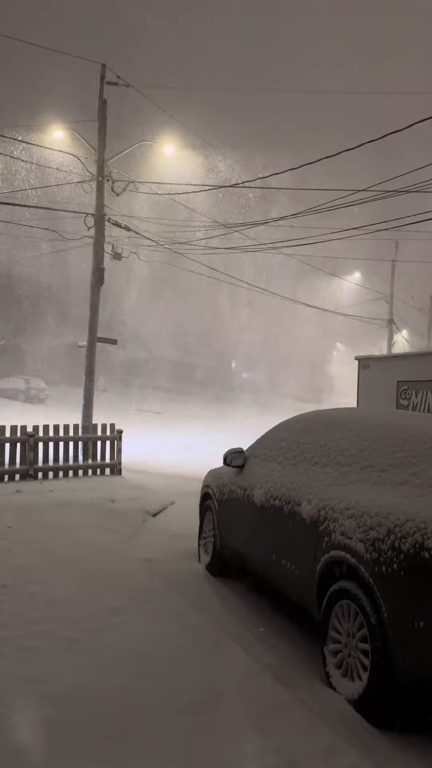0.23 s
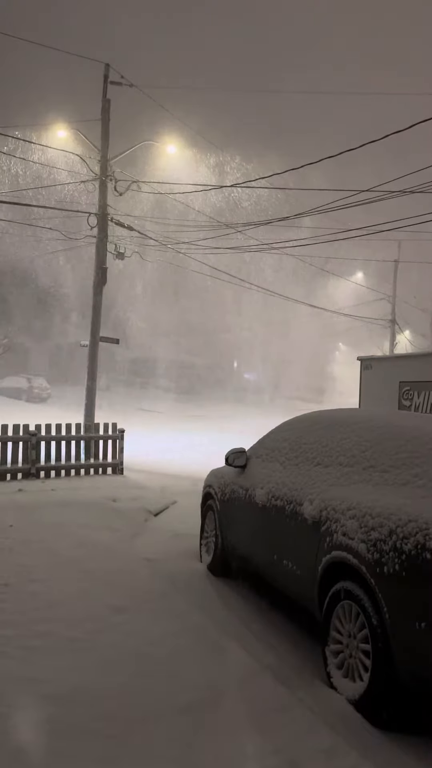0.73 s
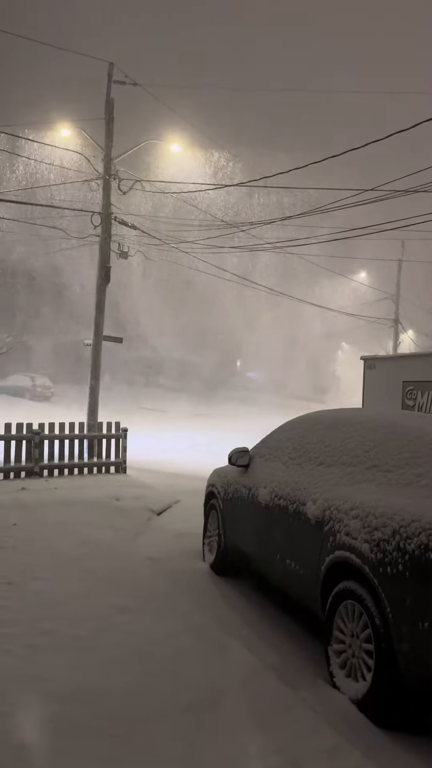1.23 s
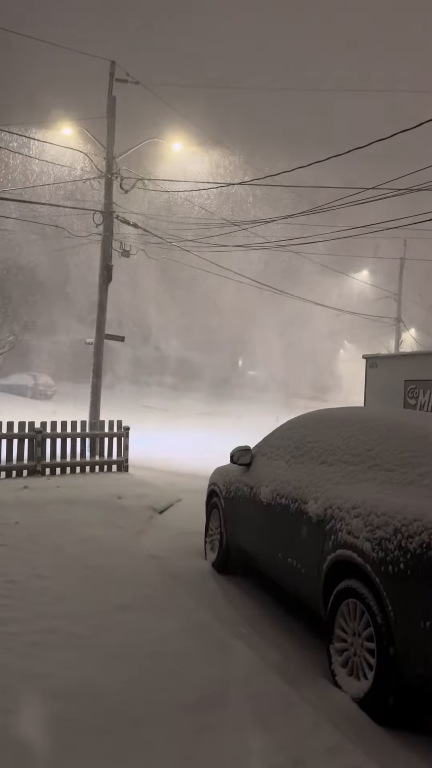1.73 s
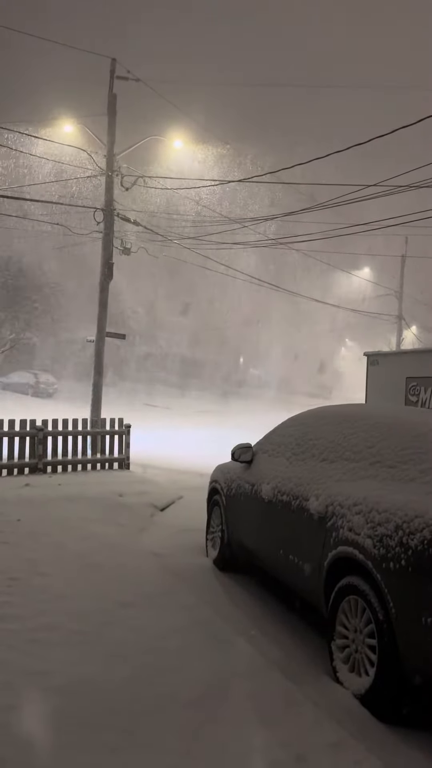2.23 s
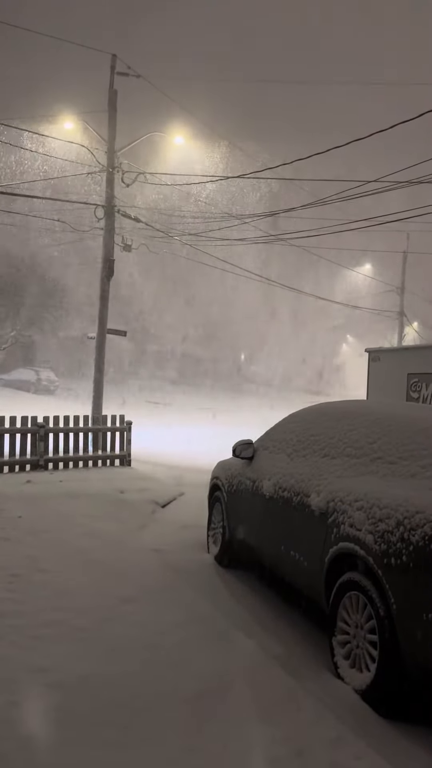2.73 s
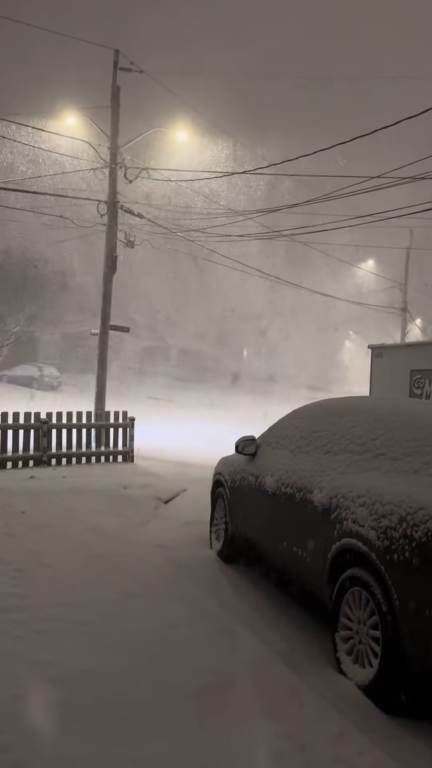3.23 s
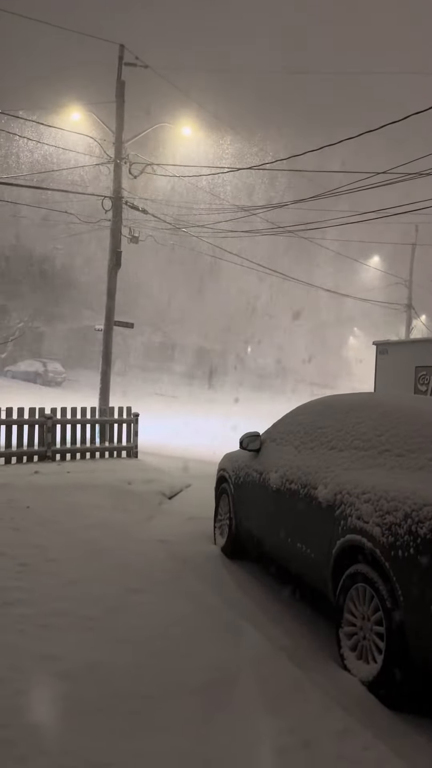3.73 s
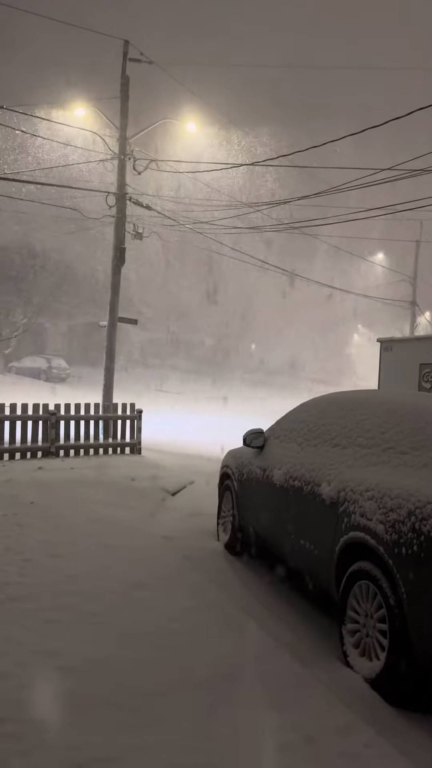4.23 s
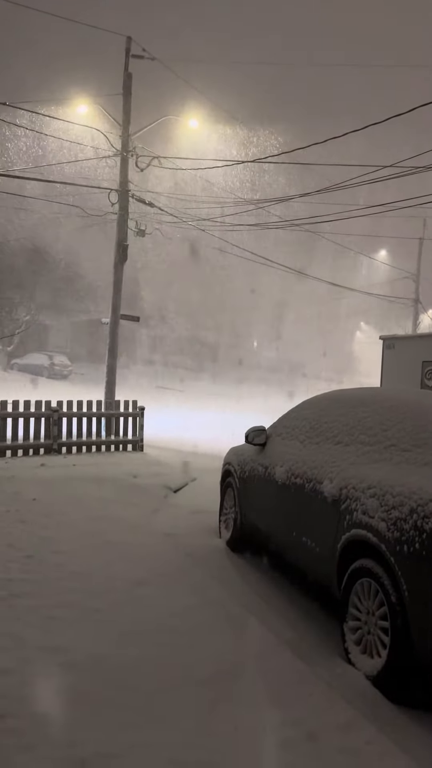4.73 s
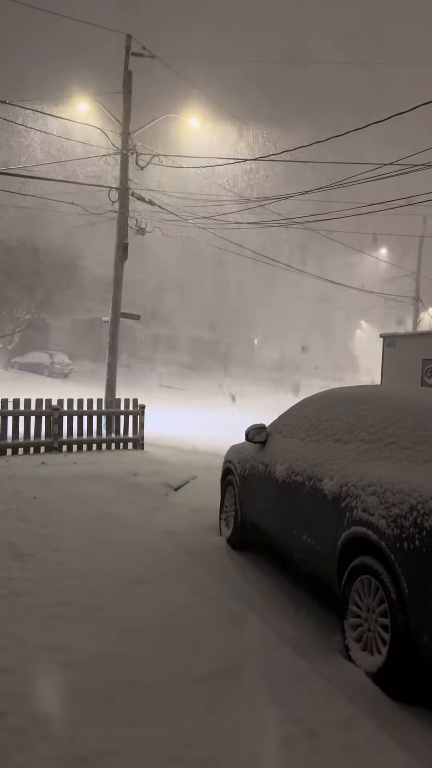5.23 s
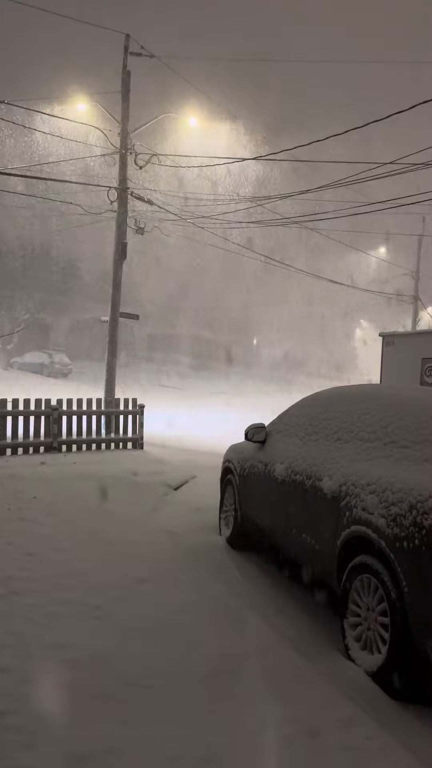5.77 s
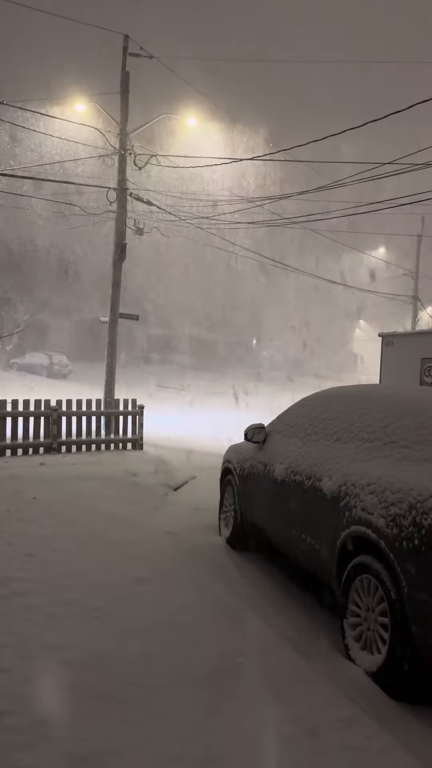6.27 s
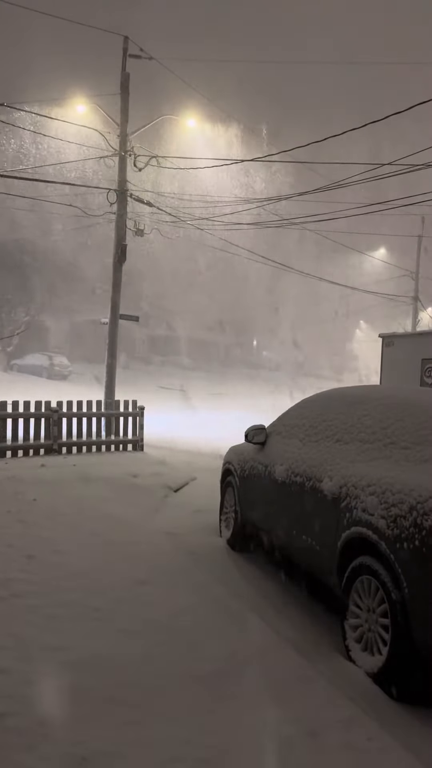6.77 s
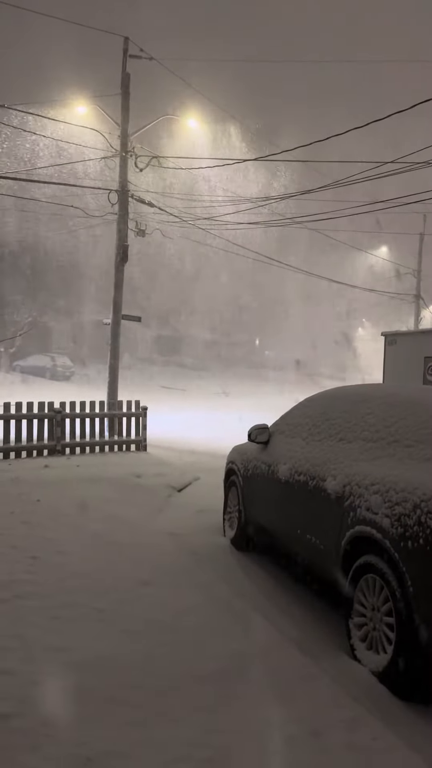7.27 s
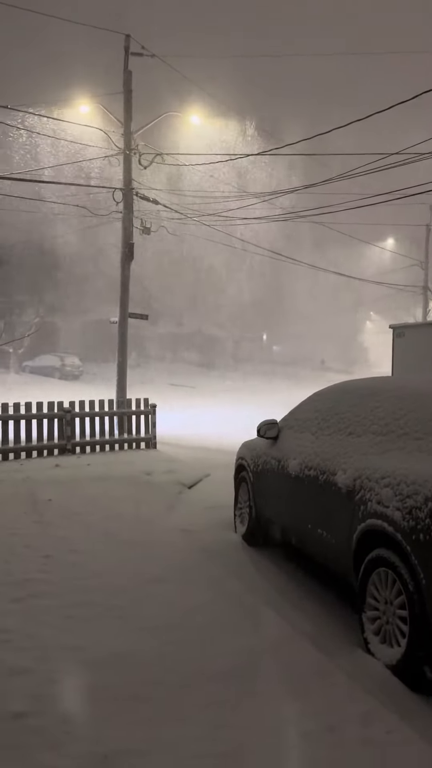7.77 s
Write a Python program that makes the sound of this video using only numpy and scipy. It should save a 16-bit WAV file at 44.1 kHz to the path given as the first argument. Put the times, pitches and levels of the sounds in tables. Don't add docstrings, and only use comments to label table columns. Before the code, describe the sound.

An engine idles with a low, wavering throb while snowstorm wind rumbles and hisses around it, with one tiny icy tick early on.

```python
import sys
import numpy as np
from scipy import signal
from scipy.fft import irfft
from scipy.io import wavfile
from scipy.ndimage import uniform_filter1d

SR = 44100
rng = np.random.default_rng(int(sys.argv[2]) if len(sys.argv) > 2 else 0)


def boost_factor(decibels):
    exponent = np.asarray(decibels, float) / 20
    return 10 ** exponent


def inscribe(sig):
    pcm = np.round(np.clip(np.atleast_2d(sig).T, -1, 1) * 32767)
    wavfile.write(sys.argv[1], SR, pcm.astype(np.int16))


N = 352800
HZ = np.fft.rfftfreq(N, 1 / SR)
TIME = np.arange(N) / SR
SIDES = np.array([[1], [-1]])

# time_s, firing_rate_hz, level_db, tailpipe_ring_db (over the level)
IDLE_CURVE = [(0.0, 48.53, -34, -26), (0.25, 48.77, -42, -5), (0.75, 46.2, -39.5, 1), (1.2, 46.88, -38, -2),
              (1.42, 47.3, -34.5, -10.5), (1.8, 47.23, -35, -9.5), (2.0, 47.4, -36, -8),
              (2.4, 46.45, -36, -4.5), (2.8, 45.76, -38.5, -0.5), (3.6, 45.57, -38.5, -1),
              (4.4, 46.2, -37.5, -2), (5.0, 45.62, -39, -3.5), (5.3, 44.98, -37.5, -6.5),
              (6.15, 46.4, -37.5, -5.5), (6.45, 46.74, -38.5, -9), (6.75, 46.12, -38, -4),
              (7.55, 46, -43, -2.5), (8.0, 46.3, -37.5, -8.5)]
# start_s, length_s, strength_db
DRAUGHT_SPELLS = [
    (0.15, .3, -1),
    (1.55, 1.3, 13.5),
    (3.2, 0.38, 8),
    (4.1, 0.29, 9),
    (4.45, 1.2, 6),
    (6.05, 1.1, 18),
    (7.15, 0.94, 6.5),
]
DRAUGHT_EDGE_S = 0.06
# start_s, level_db, brightness_db
ICE_TICKS = [
    (0.5783, -43.5, 6),
    (.5812, -52, -6),
    (0.611, -62, 13),
]


def unit(x):
    return x / np.sqrt(np.mean(x ** 2))


def over_hz(table, hz):
    f, v = np.transpose(table)
    return np.interp(np.log(hz + 1), np.log(f + 1), v)


def over_time(table):
    s, *columns = np.transpose(table)
    return [np.interp(TIME, s, c) for c in columns]


def spells(table, edge_s):
    levels_db = []
    for s, length, db in table:
        inside_s = np.minimum(TIME - s, s + length - TIME)
        levels_db.append(db * np.clip(inside_s / edge_s + .5, 0, 1))
    return np.max(levels_db, axis=0)


def walk(rate):
    k = int(SR / rate)
    held = np.repeat(rng.standard_normal(N // k + 1), k)
    return unit(uniform_filter1d(uniform_filter1d(held, k), k)[:N])


def white():
    return rng.standard_normal(len(HZ)) + 1j * rng.standard_normal(len(HZ))


def lorentzian(hz, width):
    return white() / (1 + (2 * (HZ - hz) / width) ** 2)


def resonance(hz, width):
    return unit(irfft(lorentzian(hz, width), N))


def two_ports():
    # frequency_hz, likeness_0_to_1
    likeness = [(60, 1), (200, 0.99), (380, 0.76), (700, 0.3), (1290, 0.5), (1650, .62), (1950, 0.7),
                (2390, .15), (4420, 0.05), (5000, .12), (5500, .45), (5950, .83), (7000, 0.7), (9000, 0.2)]
    # frequency_hz, lead_rad
    port_lead = [(0, 0), (260, 0), (690, 1.1), (1290, .2), (1720, .5), (1980, 0), (2330, 1.4), (2930, 2.5),
                 (3270, 2.4), (3620, 6.2), (4570, 6.3)]
    # frequency_hz, level_db
    port_lean = [(60, 0.0), (97, 0.0), (160, 0.5), (250, 0), (410, 3), (650, 3), (1050, 1.5), (1700, 5),
                 (2740, 2.5), (4420, 1)]
    like = np.clip(over_hz(likeness, HZ), 0, 1)
    like = np.sqrt(like)
    shared = white() * np.exp(.5j * SIDES * over_hz(port_lead, HZ))
    own = np.array([white(), white()])
    field = np.sqrt(like) * shared + np.sqrt(1 - like) * own
    return boost_factor(SIDES * over_hz(port_lean, HZ) / 2) * field


def restless(colour, level_db, lo_hz, hi_hz, swell_db, flicker_db, rate):
    field = two_ports() * boost_factor(over_hz(colour, HZ))
    field = field / np.sqrt(np.mean(irfft(field, N) ** 2))
    out, swell = 0, walk(1.4)
    for hz in lo_hz * 2 ** np.arange(0, np.log2(hi_hz / lo_hz), .5):
        band = np.cos(np.pi * np.clip(np.log2((HZ + 1) / hz), -.5, .5)) ** 2
        flicker = flicker_db * min(1, (600 / hz) ** 0.12) * walk(rate)
        out = out + irfft(field * band, N) * boost_factor(level_db(hz) + swell_db * swell + flicker)
    return out


def ports():
    air_db = -112 + spells(DRAUGHT_SPELLS, DRAUGHT_EDGE_S)
    slope = np.clip((HZ - 5600) / 1400, 0, 1) * (6000 / (HZ + 1)) ** 0.46
    notch = boost_factor(-2.5 / (1 + ((HZ - 12000) / 1000) ** 2))
    apart = unit(irfft(white() * slope * notch, N)) * boost_factor(-82.5 + 0.65 * walk(8))
    top = unit(irfft(white() * (HZ > 13750) * (HZ < 15700) * (HZ / 15000) ** 3, N))
    top = top + .45 * resonance(9800, 1100)
    common = top * boost_factor(.28 * (air_db + 100) - 96 + 1.6 * walk(25))
    return apart * SIDES + common


def wind():
    # time_s, level_db
    gust_curve = [(0.0, -1), (0.5, 0), (0.67, -5), (1.3, -1), (1.67, 4), (2.03, -5), (2.2, 5.5), (2.8, -1),
                  (3.6, -1.5), (3.9, 8), (4.25, -3.5), (4.6, -2), (5.17, -4.5), (5.5, 1), (6.3, -2.5),
                  (7.2, 1), (7.5, -4), (7.85, 5)]
    # frequency_hz, density_db (per Hz)
    roar_colour = [(18, -32.5), (26, -20.5), (38, -12.5), (50, -4), (60, 0.5), (75, -3), (92, -10),
                   (115, -9), (170, -14.5), (260, -24), (500, -39.5), (700, -60)]
    # frequency_hz, density_db (per Hz)
    hiss_colour = [(150, -23), (250, -10), (440, -14.5), (700, -18), (1000, -23), (2200, -27.5),
                   (2600, -27.5), (3300, -28.5), (4800, -37), (5300, -42), (7000, -49), (9000, -54),
                   (10300, -60.5), (11000, -85)]
    gust_db = over_time(gust_curve)[0]
    snow_db = 0.088 * (spells(DRAUGHT_SPELLS, DRAUGHT_EDGE_S) - 8)
    veer_db = -0.26 * (TIME - 4)

    def roar_db(hz):
        return -43.5 + 0.64 * gust_db * (hz < 80)

    def hiss_db(hz):
        snow = snow_db * np.clip(np.log2(hz / 3000), 0, 1)
        return -56.5 + 0.05 * gust_db + snow + veer_db * (hz > 2400)

    roar = restless(roar_colour, roar_db, 24, 700, swell_db=0.0, flicker_db=0.83, rate=9.7)
    hiss = restless(hiss_colour, hiss_db, 175, 13000, swell_db=.25, flicker_db=1.2, rate=10)
    return roar + hiss


def sleet():
    # start_s, length_s, strength_db
    flurries = [
        (0.7, .8, 7.5),
        (2.7, .5, 8),
        (3.2, .65, 10),
        (5.7, 2.6, 12),
    ]
    grains_db = -97 + spells(flurries, .25) + 3.1 * walk(26)
    grains = boost_factor(grains_db) * resonance(6360, 1400)
    since = TIME - ICE_TICKS[0][0]
    fade = np.clip(since / .004, 0, 1) * np.exp(-np.abs(since) / 0.042)
    crackle = boost_factor(-71.0 + 2.2 * walk(250)) * fade
    return grains + crackle * np.array([resonance(6700, 1200), resonance(7200, 1300)])


def puffs():
    # start_s, length_s, pitch_hz (at the start), level_db
    port_puffs = [
        (0.92, 0.06, 90, -52),
        (2.838, 0.061, 80, -53),
        (5.019, 0.056, 109.7, -54),
        (5.158, 0.14, 100, -52),
        (5.248, 0.09, 109.6, -52),
        (5.362, 0.076, 100.2, -53),
        (5.578, 0.11, 79.54, -61),
        (6.432, 0.013, 400.5, -52),
        (6.449, 0.052, 115, -60),
    ]
    out = np.zeros(N)
    for s, length, hz, db in port_puffs:
        u = np.arange(int(length * SR)) / (length * SR)
        phase = 2 * np.pi * np.cumsum(hz * 0.5 ** u) / SR
        out[int(s * SR):int(s * SR) + len(u)] += boost_factor(db) * np.sin(np.pi * u) * np.sin(phase)
    return out * SIDES


def ticks():
    # frequency_hz, t60_s, level_db, pan_db (left minus right), lead_rad (left leads)
    ice_modes = [(2440, .018, -6, 4, 2.6), (2800, 0.011, -3, 2, 2.2), (3200, .012, 3, -1, 1.8),
                 (3460, 0.024, 1.5, 7, 1.2), (3740, 0.013, -8, -2, 1.2), (4050, 0.033, 0.5, -4, 2.4),
                 (4270, 0.03, -1.5, -1, 1.3), (4630, 0.011, -6.5, 3, 1.5), (5200, .008, -16, 0, .8),
                 (5800, 0.011, -12.5, -5, .3), (6600, .008, -14, 1, .8), (7180, .013, -5.5, 6, 1.2),
                 (7460, .009, -10, -3, 1.2)]
    rise_s = 0.00092
    out, t = np.zeros((2, N)), np.arange(SR // 10) / SR
    push = 1 - np.exp(-(t / rise_s) ** 2)
    turns = rng.random((len(ICE_TICKS), len(ice_modes)))
    for (s, db, bright_db), turn in zip(ICE_TICKS, turns):
        start = int(s * SR)
        for (hz, t60, mode_db, pan_db, lead), u in zip(ice_modes, turn):
            swing = np.sin(2 * np.pi * (hz * (t - rise_s) + .25 + .3 * u) + SIDES * lead / 2)
            ring = swing * np.exp(-np.log(1000) * t / t60) * push
            ring_db = db + mode_db - 4 + bright_db * (hz > 5000) + SIDES * pan_db / 2
            out[:, start:start + len(t)] += boost_factor(ring_db) * ring
    return out


def panels():
    # frequency_hz, width_hz, level_db, pan_db (left minus right),
    panel_modes = [(1113, 50, -76, 4, 1.8), (1224, 33, -76.5, 5, 0.29), (346, 30, -71, -0.5, 0.12),
                   (520, 48, -74.5, 4, 0.27), (581, 32, -79, -2.5, 0.35), (688, 23, -78, 3, .4),
                   (1046, 40, -86.5, 0.5, .3), (1436, 110, -82, 2, .2), (1643, 56, -80, 3, 0.15),
                   (2128, 160, -79, 1, 0.4), (2350, 35, -81, -1, 0.53), (1558, 46, -81.5, 4.5, 0.25),
                   (1784, 33, -76.5, -0.5, 0.67), (1968, 120, -76, -6.5, 0.092), (2447, 110, -74, -2, 1.5),
                   (2782, 79, -74, -5, 2.32), (2936, 100, -77, 1, 2.3), (3157, 80, -78.5, 3, 1.3),
                   (3340, 30, -83, -1, 2.8)]
    sets = np.zeros((3, 2, len(HZ)), complex)
    for k, (hz, width, db, pan_db, lead) in enumerate(panel_modes):
        ring = lorentzian(hz, width)
        ring = ring * N / np.sqrt(2 * np.sum(np.abs(ring) ** 2))
        sets[k % len(sets)] += boost_factor(db + SIDES * pan_db / 2) * np.exp(.5j * SIDES * lead) * ring
    return sum(irfft(rings, N) * boost_factor(1.1 * walk(4.5)) for rings in sets)


def growl():
    # start_s, length_s, strength_db
    rough_burns = [(0, 0.17, 5), (.55, 0.12, 9.5), (1.0, 0.32, 4.5), (1.55, 0.7, 2.5), (3.27, 0.16, 0.5),
                   (3.95, 0.23, 6), (4.55, .27, 5.5), (5.2, 0.431, 3), (6.5, 0.25, 3.5), (7.15, 0.14, 4.5),
                   (7.7, 0.28, 1.5)]
    level_db = over_time(IDLE_CURVE)[1]
    surge_db = 0.18 * (level_db - level_db.mean()) + spells(rough_burns, 0.12) + walk(5.5)
    gain = boost_factor(-56 + surge_db - 2.5 + 0.7 * walk(11))
    return gain * (resonance(190.8, 45) + 0.43 * resonance(237.2, 16))


def engine():
    pulse_phase = [0., 2.3, 1.9]
    hz, level_db, ring_db = over_time(IDLE_CURVE)
    third_db = level_db - 13.5 + 0.44 * ring_db - 1.6 * (hz - 46.2)
    orders_db = [level_db, level_db + ring_db, third_db]
    phase = 2 * np.pi * np.cumsum(hz) / SR + 0.087 * walk(9)
    out = 0
    for k, (db, shift, shake_db) in enumerate(zip(orders_db, pulse_phase, [.7, .8, 1.1])):
        size = np.sqrt(2) * boost_factor(db + shake_db * walk(6))
        out = out + size * np.cos((k + 1) * phase + shift)
    return out


def scene():
    return ports() + wind() + sleet() + puffs() + ticks() + panels() + growl() + engine()


def roll_off(x):
    return signal.sosfilt(signal.butter(12, 15720, fs=SR, output="sos"), x)


def record(dry):
    return roll_off(dry)


dry = scene()
out = record(dry)
inscribe(out)
```